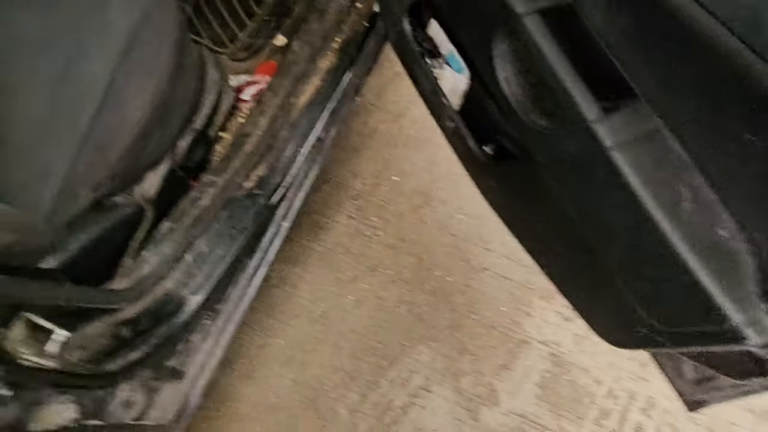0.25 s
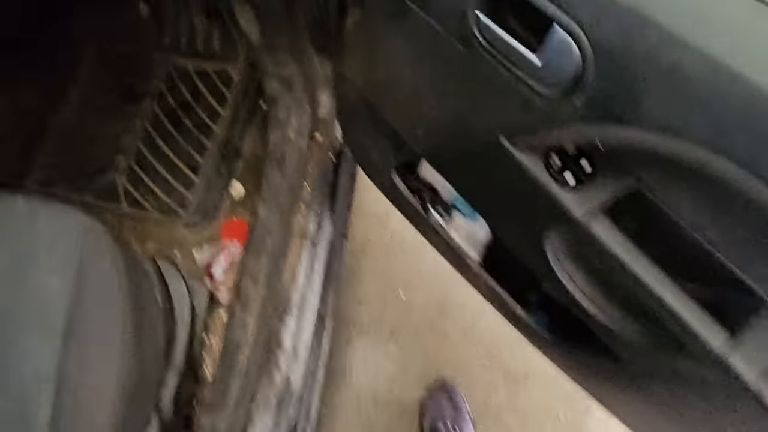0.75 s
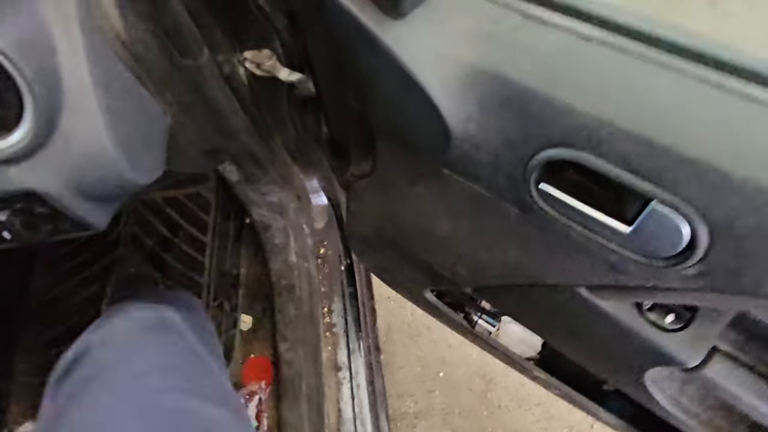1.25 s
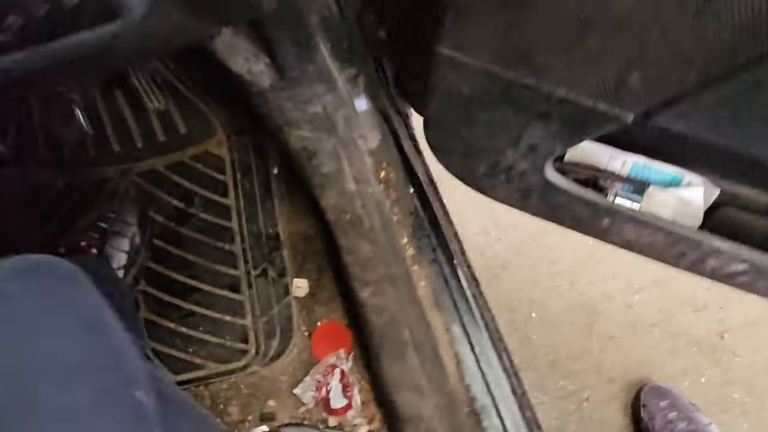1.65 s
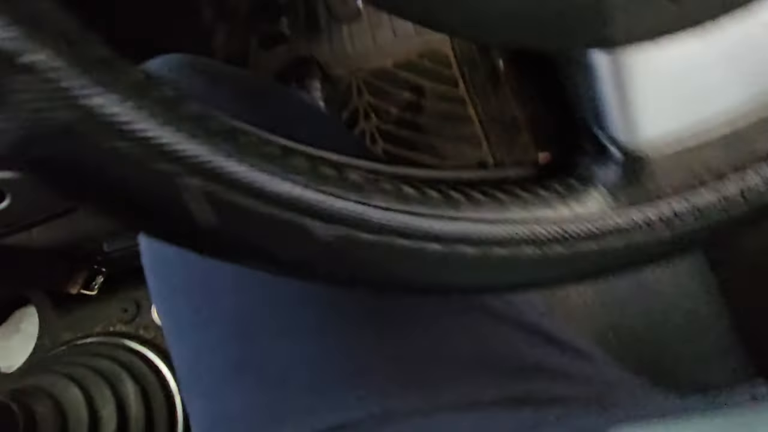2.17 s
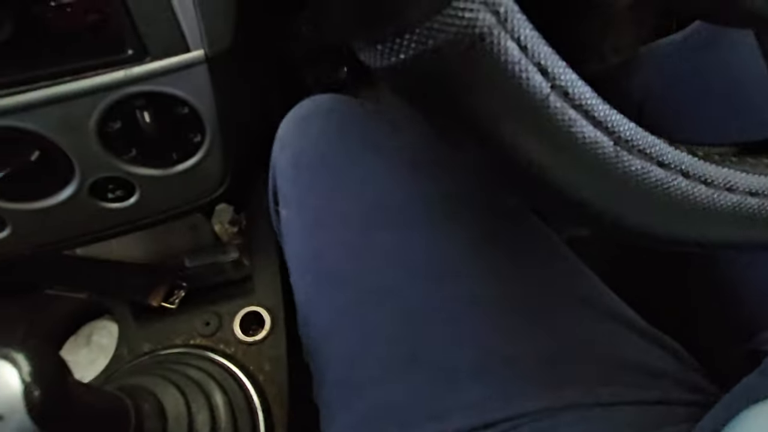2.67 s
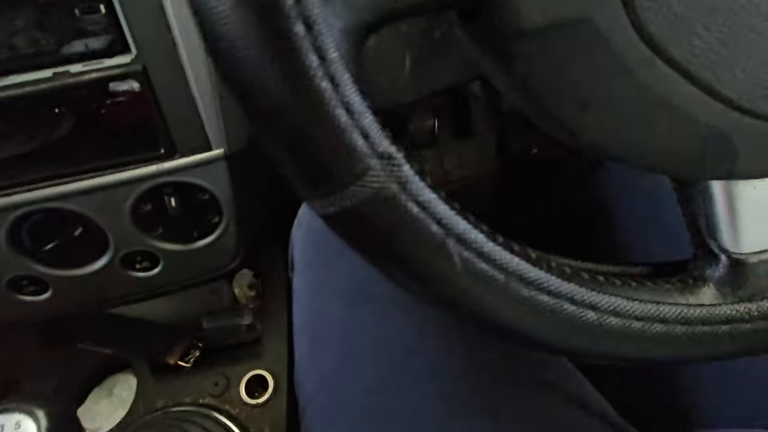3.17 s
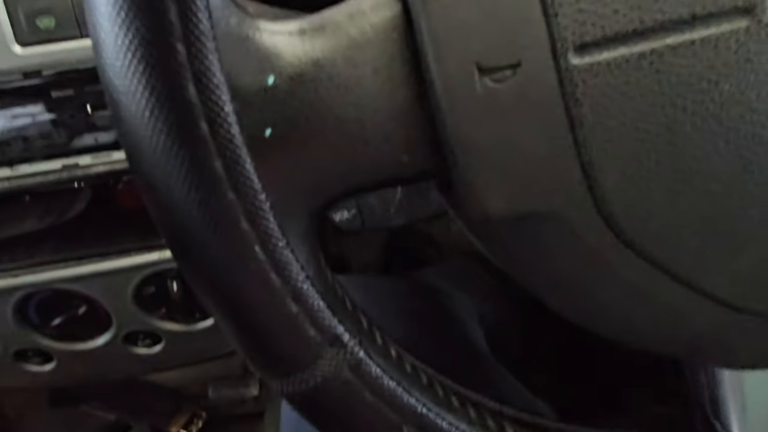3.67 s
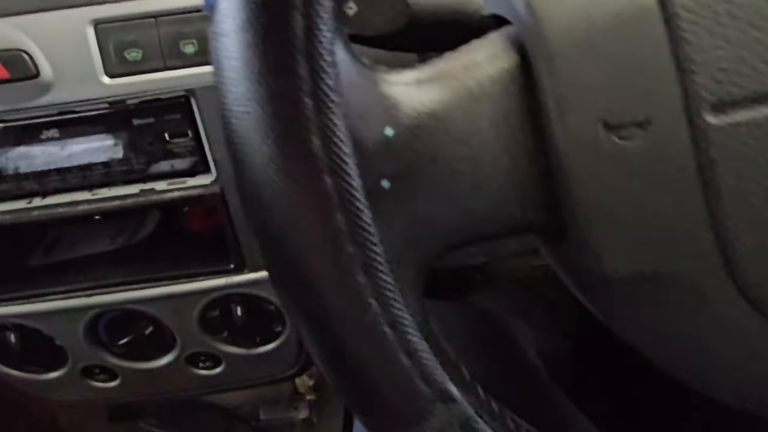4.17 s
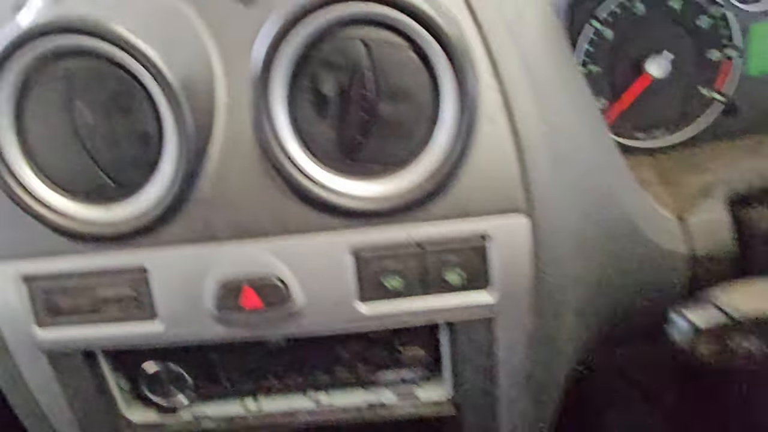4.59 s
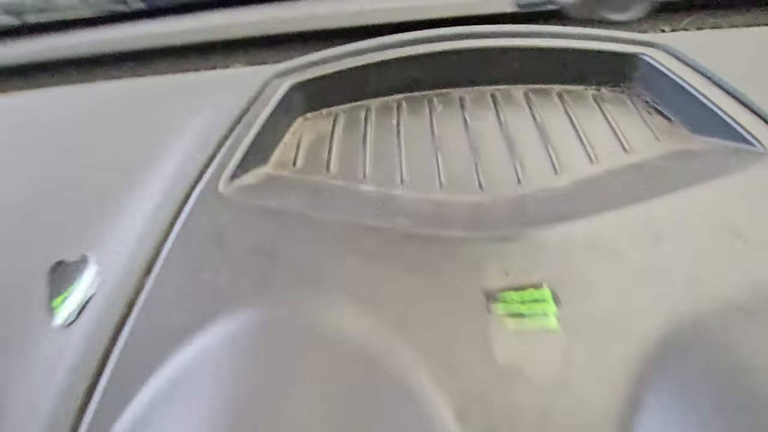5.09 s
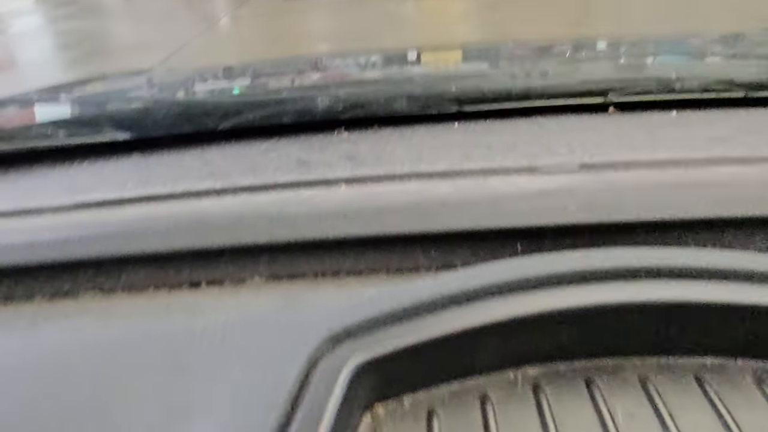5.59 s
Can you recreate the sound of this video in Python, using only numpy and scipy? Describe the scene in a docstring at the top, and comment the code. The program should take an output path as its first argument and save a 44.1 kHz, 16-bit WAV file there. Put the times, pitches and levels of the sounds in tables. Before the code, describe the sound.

Keys clink as someone climbs into a small car from a roaring garage, slams the door into hush, then clatters keys on plastic.

```python
"""Someone climbs into a small car in a noisy garage, keys in one hand and phone in the other.
First a diffuse roar (coloured noise), rustling cloth (grainy noise) and clinking keys (decaying modes);
feet and knees knock the body (noise cracks, panel and cabin modes), fingers tap the phone, soles scrape.
Then the door groans (gliding tones), latches and slams (cracks, modes, low tones) and seals out the roar.
In the quiet cabin the seat ticks, and the lifted bunch of keys clatters against ringing plastic trim."""
import sys
import numpy as np
from scipy import signal
from scipy.fft import rfft, irfft, next_fast_len
from scipy.io import wavfile
from scipy.ndimage import uniform_filter1d

SR = 44100
rng = np.random.default_rng(int(sys.argv[2]) if len(sys.argv) > 2 else 0)


def file_out(sig):
    """Save sig as 16-bit WAV at sys.argv[1]."""
    # one column per channel
    cols = np.atleast_2d(sig).T
    # limit, then scale
    lim = np.clip(cols, -1, 1)
    pcm = np.round(lim * 32767).astype(np.int16)
    wavfile.write(sys.argv[1], SR, pcm)


N = 257352  # samples
# In all tables, side/dB is left minus right, and t60/s is the time of a 60 dB decay.


def amp(db):
    """Logarithmic level: decibels to amplitude gain."""
    return np.exp(np.asarray(db) * (np.log(10) / 20))


def unit(x):
    """Normalisation: scale to rms 1."""
    return x / np.sqrt(np.mean(x ** 2) + 1e-20)


def unit_attack(x, size=441):
    """Onset normalisation: scale a blow to rms 1 over its first samples."""
    return x / np.sqrt(np.mean(x[..., :size] ** 2) + 1e-20)


def panned(x, side_db):
    """Interaural level difference: share a sound between left and right at constant power."""
    ratio = amp(np.atleast_1d(side_db))
    return x * np.array([ratio, np.ones_like(ratio)]) * np.sqrt(2 / (1 + ratio ** 2))


def add(out, s, x):
    """Superposition: mix a sound in at a time in seconds."""
    i = int(np.clip(s * SR, 0, N - 1))
    out[:, i:i + x.shape[1]] += x[:, :N - i]


def colour(x, points):
    """Minimum-phase filtering: a causal response through (f/Hz, level/dB) points."""
    size = next_fast_len(x.shape[-1] // 2 + 2048, real=True) * 2
    hz, db = np.transpose(points)
    f = np.arange(size // 2 + 1) * SR / size + 1  # the 1 Hz offset avoids log(0)
    below_first = np.minimum(f / hz[0], 1) ** 2  # falls 12 dB per octave
    gain = amp(np.interp(np.log(f), np.log(hz), db)) * below_first
    # fold the cepstrum onto positive times
    cepstrum = irfft(np.log(gain))
    cepstrum[1:size // 2] *= 2
    cepstrum[size // 2 + 1:] = 0
    return irfft(rfft(x, size) * np.exp(rfft(cepstrum)))[..., :x.shape[-1]]


def brighter(points, treble_db, from_hz=2500, full_hz=9000):
    """Contact stiffness: a harder or softer contact lifts or lowers the treble of a response."""
    return [(hz, db + treble_db * np.interp(hz, [from_hz, full_hz], [0, 1])) for hz, db in points]


def pair(size, likeness, lag_count=0):
    """Partial coherence: noise partly shared by two microphones; the right one may hear it first."""
    shared, own = rng.standard_normal(size), rng.standard_normal((2, size))
    likeness = np.clip(likeness, 0, 1)
    common = np.array([np.roll(shared, lag_count), shared])
    return np.sqrt(likeness) * common + np.sqrt(1 - likeness) * own


def fade(t60, size=SR // 3):
    """Exponential decay of a damped vibration."""
    return np.exp(-np.log(1000) * np.arange(size) / SR / max(t60, 1 / SR))


def swell(start, length, attack_s, t60):
    """Envelope of a movement: it builds up to its start, holds and dies away."""
    t = np.arange(N) / SR
    rise = np.clip(1 + (t - start) / attack_s, 0, 1) ** 2
    return rise * amp(-60 * np.clip((t - start - length) / t60, 0, 2))


def walk(rate):
    """Slow random modulation: chance levels joined smoothly, spread near 0.5."""
    size = int(SR / rate)
    steps = np.repeat(rng.standard_normal(N // size + 1), size)
    return 0.61 * uniform_filter1d(steps, size)[:N]


def shifting(x, rate, depth_db, count=7):
    """Octave-band modulation: each register from 250 Hz up swells and sinks on its own."""
    size = next_fast_len(N, real=True)
    spectrum = rfft(x, size)
    hz = (np.arange(spectrum.shape[1]) + 1) * SR / size
    register = np.clip(np.log2(hz / 250), 0, count - 1)
    out = 0
    for k in range(count):
        band = irfft(spectrum * np.maximum(1 - abs(register - k), 0), size)[:, :N]
        out = out + band * amp(depth_db * walk(rate))
    return out


def grains(length, grain_db, size=60):
    """Granular friction: tiny contacts of uneven strength, as a gain of rms 1."""
    return unit(np.repeat(amp(grain_db * rng.standard_normal(length // size + 1)), size)[:length])


def ring(modes, stretch=1, scatter_db=2, detune=.01, spread=0.68, lag_count=0):
    """Modal superposition: each blow reweights the modes; the microphones hear differing phases."""
    t, out = (np.arange(SR // 3) - np.array([[lag_count], [0]])) / SR, 0
    for hz, db, t60 in modes:
        size, tune, phase = rng.standard_normal(3)
        angle = 2 * np.pi * hz * (1 + detune * tune) * t + spread * phase * np.array([[1], [-1]])
        level = amp(db + scatter_db * size)
        out = out + level * fade(t60 * stretch) * np.sin(angle.astype(np.float32))
    return out


def struck_at(modes, lead_hz, others_db):
    """Selective excitation: the struck spot favours one mode, set to 0 dB, over the others."""
    lead = np.argmin([abs(hz - lead_hz) for hz, _, _ in modes])
    return [(hz, 0 if k == lead else db + others_db, t60) for k, (hz, db, t60) in enumerate(modes)]


def crack(t60, tail_db, likeness, snap_s=0.0078, rise_s=0.027):
    """Impact noise: a sharp snap and the brief buzz of the parts that met."""
    decay = fade(snap_s) + amp(tail_db) * fade(t60)
    return pair(SR // 3, likeness, lag_count=17) * decay * (1 - fade(rise_s))


def rubbed(x, t60, size=882):
    """Repeated contact: chatter of some milliseconds blurs the onset of a ring."""
    chatter = rng.standard_normal(size) * fade(t60, size) * .06
    chatter[0] = 1
    return signal.oaconvolve(x, chatter[None], axes=1)[:, :x.shape[1]]


# diffuse roar of the hall: f/Hz, level/dB
ROAR_COLOUR = [(82, -31), (140, -1.5), (269, -6.5), (309, -12.5), (417, -7.5), (584, -11.5), (958, -18.5),
               (1260, -22.5), (1840, -27), (2160, -26.5), (2970, -33), (4590, -32.5), (8480, -45),
               (13400, -55), (16000, -46)]
# hollow band in the roar: f/Hz, level/dB
HOLLOW_BAND = [(700, -19.5), (950, -1.5), (1090, -3), (1250, -13.5), (1550, -21.5), (2100, -14.5),
               (2600, -20), (16000, -61.5)]
# dull trace through the body: f/Hz, level/dB
LEAK_RESPONSE = [(60, 3), (130, -3), (200, -15.5), (300, -16.5), (400, -14), (530, -12.5), (700, -30),
                 (1200, -37.5), (4000, -40), (16000, -32.5)]
# the roar fades as the phone nears the door opening, drops once inside and is sealed off by the door
GARAGE_DB, GARAGE_FALL_DB_PER_S, GARAGE_SIDE_DB = -32.5, 3.5, -1
INSIDE_S, DUCK_IN_S, INSIDE_DB, SEAL_DB_PER_S = 2.03, 0.04, -4, 97
HOLLOW_DB, HOLLOW_FALL_DB_PER_S, LEAK_DB = -36.5, 19.5, -67.5


def garage():
    """Diffuse field and transmission loss: a roar, hollow at first, fades over a steady dull trace."""
    t = np.arange(N) / SR
    inside = np.clip((t - INSIDE_S) / DUCK_IN_S + .5, 0, 1)
    roar = unit(shifting(colour(pair(N, 0.27), ROAR_COLOUR), rate=7.6, depth_db=1.5))
    roar = roar * amp(GARAGE_DB - GARAGE_FALL_DB_PER_S * t + INSIDE_DB * inside)
    hollow = unit(colour(pair(N, 0.18), HOLLOW_BAND)) * amp(HOLLOW_DB - HOLLOW_FALL_DB_PER_S * t)
    seal = amp(-SEAL_DB_PER_S * np.maximum(t - LATCH_CONTACTS[0][0], 0))  # from the first latch contact
    leak = amp(LEAK_DB) * unit(colour(pair(N, 1.0), LEAK_RESPONSE))
    return panned((roar + hollow) * seal, GARAGE_SIDE_DB) + leak


# the body steps up, leans in, slides onto the seat, settles, shifts, reaches out:
# t/s, length/s, rumble level/dB, cloth level/dB, rumble side/dB, cloth side/dB
BODY_MOVES = [(0, 0.37, -27.5, -48, 3.5, 30), (0.463, 0.2, -43, -45, -5, -5),
              (0.76, 0.62, -31.5, -54, -1, 3.5), (1.471, 0.34, -26, -42, 8.5, 2),
              (2.006, 0.71, -34, -53.5, 0, -0.5), (3.229, 0.046, -57.5, -73.5, -8, -2.5),
              (3.76, 0.16, -85.5, -71, 0, -10), (4.198, 0.042, -54, -72, -5, -8),
              (4.401, 0.74, -43, -48.5, 0, 0), (5.258, .08, -39.5, -42, -1, 3),
              (5.5, 0.4, -38, -39, -2, 1.5)]
# rustle of clothes: f/Hz, level/dB
CLOTH_RESPONSE = [(300, 7.5), (700, 1.5), (1500, -4.5), (3500, -5), (7000, -9.5), (11000, -10.5),
                  (16000, -9)]
MOVE_ATTACK_S, RUMBLE_T60_S, CLOTH_T60_S = 0.27, 0.64, 0.21
FITS_PER_S, FITS_DB = 14, 2.1  # cloth slides in fits and starts; dB per unit of walk()


def cloth():
    """Stick-slip friction: fibres catch and creases slip with every move, a grainy hiss."""
    catches = grains(N, grain_db=3.0) * grains(N, grain_db=2, size=350)
    hiss = colour(pair(N, 0.11) * catches, CLOTH_RESPONSE)
    effort = 0
    for s, length, _, db, _, side_db in BODY_MOVES:
        effort = effort + panned(amp(db) * swell(s, length, MOVE_ATTACK_S, CLOTH_T60_S), side_db)
    return unit(hiss * amp(FITS_DB * walk(FITS_PER_S))) * effort


# low resonances of the cabin: f/Hz, level/dB
RUMBLE_RESPONSE = [(15, -45.5), (25, -11), (52, 0), (70, 2.5), (156, -9.5), (236, -17), (282, -16.5),
                   (300, -20.5), (390, -43.5), (660, -120)]


def rumble():
    """Forced low resonance: shifting weight stirs the bass of the cabin."""
    weight = 0
    for s, length, db, _, side_db, _ in BODY_MOVES:
        weight = weight + panned(amp(db) * swell(s, length, MOVE_ATTACK_S, RUMBLE_T60_S), side_db)
    return unit(colour(pair(N, 0.84), RUMBLE_RESPONSE)) * weight


# modes of a key: f/Hz, relative level/dB, share of the ring time
BLADE_MODES = [(5650, -24, .8), (7235, -20, 1), (8400, -11, .8), (9257, -5, 1), (9590, -15, .6),
               (10182, -15, 1.1), (12296, -13, .5), (13252, -1, 1), (14150, -12, .6), (14418, 0, 1),
               (14630, -8, .5), (15650, -7, .6)]
# a jolt of the hand shakes the bunch: t/s, length/s, level/dB
HAND_SHAKES = [(0, 0.044, -46.5), (0.422, 0.0094, -44), (1.535, 0.13, -48), (1.955, 0.064, -39.5),
               (2.284, 0.052, -46), (4.34, 0.16, -46), (5.167, 0.058, -44), (5.252, 0.046, -32.5),
               (5.497, 0.015, -27.5), (5.679, 0.024, -33)]
SHAKE_ATTACK_S, SHAKE_T60_S = 0.061, 0.09


def jingle(rate=170, ring_s=0.036, graze_db=-2, count=12):
    """Random impact train: while the bunch is shaken, several keys keep grazing each other lightly."""
    out, shake = 0, 0
    for s, length, db in HAND_SHAKES:
        shake = shake + amp(db) * swell(s, length, SHAKE_ATTACK_S, SHAKE_T60_S)
    for _ in range(count):
        touches = (rng.random(N) < rate / count / SR) * amp(3.5 * rng.standard_normal(N))
        blade = unit_attack(ring(BLADE_MODES, ring_s, scatter_db=8, detune=.045, spread=1.1))
        graze = colour(crack(0.035, tail_db=-2.5, likeness=0.13), [(3000, -3.0), (15000, -6.0)])
        blade = blade + amp(graze_db) * unit_attack(graze)
        blade = blade / np.sqrt(count * np.sum(blade ** 2) / 2)
        out = out + signal.oaconvolve((unit(touches) * shake)[None], blade, axes=1)[:, :N]
    return out


# the key ring swings against the fob: t/s, level/dB, side/dB
HOOP_TOUCHES = [(0.016, -36.5, -18), (0.029, -42, 11), (0.045, -36.5, -17), (0.063, -36.5, -14),
                (1.533, -38, 7), (4.367, -51, 10), (4.516, -62, -2)]
# modes of the key ring: f/Hz, relative level/dB, t60/s
HOOP_MODES = [(2300, 4.5, 0.094), (2470, 5, 0.072), (2716, 22, 0.022), (2930, -10, 0.032), (3120, -22, .05),
              (3850, -2, 0.036), (6170, 4, 0.055)]


def hoop_touches():
    """Modal vibration of a hoop: the key ring sounds as it touches the fob."""
    out = np.zeros((2, N))
    for s, db, side_db in HOOP_TOUCHES:
        hoop = ring(HOOP_MODES, scatter_db=2.5, detune=.02)
        add(out, s, amp(db) * panned(unit_attack(hoop), side_db))
    return out


# key on key, the clearest touches: t/s, ring level/dB, tick level/dB
KEY_CLINKS = [(0.042, -35, -38), (0.063, -36, -34.5), (0.2, -46, -48), (0.241, -30.5, -34),
              (0.6434, -56, -62), (0.9222, -39, -43.5), (1.349, -51, -42), (1.55, -37, -39.5),
              (1.623, -30, -37), (1.97, -49, -49), (2.0027, -48, -54), (2.076, -47, -45.5),
              (2.386, -43, -50), (3.795, -46, -60.5), (4.2217, -37.5, -45.5), (4.232, -45, -57),
              (4.326, -31, -42.5), (4.366, -34, -37), (4.511, -40, -39), (4.6305, -45, -47),
              (4.9345, -33.5, -40.5), (4.968, -41, -48), (5.2434, -27, -26.5), (5.283, -28.5, -30.5),
              (5.337, -36.5, -55), (5.366, -37, -36.5), (5.4405, -27.5, -36), (5.494, -16.5, -24),
              (5.661, -30, -31), (5.783, -18.5, -31.5)]
# the clinks start at the left, move in front of the phone and end to the left: t/s, side/dB
KEY_POSITION = [(.25, 17), (.6, 2), (4.7, -0.5), (5.83, 9)]
CLINK_T60_S, BLADE_DB = 0.046, -2  # damped blades; their level against the ring level


def clinks():
    """Contact damping: thin brass blades held in the bunch tick together and stop at once."""
    out = np.zeros((2, N))
    tick_colour = [(2200, -10.5), (3300, 5.0), (6000, -0.5), (9000, 0.5), (11500, -5.5), (16000, -5.0)]
    edge_colour = [(8000, -55), (11000, -4), (13000, -8), (14500, -18), (16000, -2.0)]
    for s, db, tick_db in KEY_CLINKS:
        tick = crack(0.087, tail_db=-16.0, likeness=0.037, snap_s=0.017)
        tick = unit_attack(colour(tick, tick_colour))
        edge = crack(0.035, tail_db=-25.0, likeness=.25, snap_s=0.0072)
        edge = unit_attack(colour(edge, edge_colour))
        blade = unit_attack(ring(BLADE_MODES, CLINK_T60_S, scatter_db=6, detune=.035, spread=1.2))
        clink = amp(tick_db) * tick + amp(db) * (edge + amp(BLADE_DB) * blade)
        add(out, s, panned(clink, np.interp(s, *np.transpose(KEY_POSITION))))
    return out


# door and sill panels: f/Hz, relative level/dB, t60/s
BODY_PANEL_MODES = [(152, 0.5, .1), (195.8, 3.5, 0.1), (238, 4.5, 0.076), (276, -2, 0.09),
                    (359, 1.5, 0.085), (406.2, 0, 0.069), (441, -5.5, 0.07), (550.6, -8.5, 0.054),
                    (690, -4.5, 0.036)]


def panel(lead_hz=230):
    """Bending modes of a plate: hollow knock of a panel under a padded push."""
    struck = struck_at(BODY_PANEL_MODES, lead_hz, others_db=-6)
    modes = ring(struck, scatter_db=2, detune=.025, spread=.4)
    return unit_attack(modes * (1 - fade(0.026)), size=882)


# plastic trim resonances: f/Hz, relative level/dB, unstretched t60/s
PLASTIC_MODES = [(760, -6, .035), (894, -2, .03), (1060, -1, .06), (1280, 0, .07), (1370, -4, .04),
                 (1560, -4, .035), (1850, -2, .04), (2090, -2, .055), (2290, -2, .045), (2620, -4, .035),
                 (3330, -4, .05), (3550, -2, .046), (4130, -2, .04), (5040, -6, .03), (5370, -6, .03)]


def trim(lead_hz=1280, others_db=0, stretch=1):
    """Heavily damped modes: short ring of the plastic trim, different at each spot."""
    struck = struck_at(PLASTIC_MODES, lead_hz, others_db)
    modes = ring(struck, stretch, scatter_db=2, detune=.018, spread=1.3)
    return unit_attack(rubbed(modes, 0.027) * (1 - fade(0.008)))


# shoes, knees and door against the car: t/s, crack level/dB, boom level/dB, panel level/dB,
# leading panel mode f/Hz, trim level/dB, side/dB, crack tail t60/s
BODY_KNOCKS = [(0.039, -41, -16.5, -45, 195, -60, 31, 0.046),
               (0.489, -27.5, -20.5, -39.5, 195, -44, -19, 0.05),
               (0.536, -31.5, -21, -32, 240, -34.5, -13, .12),
               (1.314, -26.5, -17.5, -18.5, 359, -35, -0.5, 0.085),
               (1.533, -28.5, -31, -34, 195, -40, -3, 0.017), (1.583, -37.5, -15, -20.5, 150, -48, 5, 0.17),
               (1.636, -56.5, -14.5, -43, 150, -60, 25, .07), (1.745, -35.5, -15, -21.5, 150, -50, 8, .14),
               (2.061, -40, -41, -23, 410, -56, -1.5, 0.065), (2.165, -44, -44, -30, 360, -58, -3, 0.033),
               (2.563, -26.5, -22, -20.5, 240, -46, -0.5, 0.032),
               (2.595, -20.5, -19, -25, 440, -33, 1, 0.023),
               (2.645, -41, -25, -41.5, 195, -57.5, -1, 0.028), (4.772, -46, -42, -48, 550, -44.5, -1, .06),
               (5.825, -33.5, -45, -33, 410, -50, 0, .08)]
# contact noise of a knock: f/Hz, level/dB
KNOCK_RESPONSE = [(290, -14), (500, 0), (1160, -12), (2040, -16), (2570, -23.5), (5020, -23.5), (5550, -28),
                  (8700, -33.5), (11600, -30.5), (16000, -35.5)]
# cabin air and floor: f/Hz, relative level/dB, t60/s
CABIN_MODES = [(65.15, -9.5, 0.28), (82, 2, 0.11), (122.7, -3.5, 0.12)]


def knocks():
    """Impact excitation: each blow on the car body cracks, rings panels and trim and booms the cabin."""
    out = np.zeros((2, N))
    for s, crack_db, boom_db, panel_db, panel_hz, trim_db, side_db, t60 in BODY_KNOCKS:
        contact = crack(t60, tail_db=-1.5, likeness=0.2, snap_s=0.0067, rise_s=.015)
        contact = unit_attack(colour(contact, KNOCK_RESPONSE))
        boom = ring(CABIN_MODES, scatter_db=4.5, detune=0.02, spread=0.25) * (1 - fade(0.02))
        blow = amp(crack_db) * contact + amp(panel_db) * panel(panel_hz)
        blow = blow + amp(trim_db) * trim(stretch=.55) + amp(boom_db) * unit_attack(boom, size=1323)
        add(out, s, panned(blow, side_db))
    return out


def cabin(x, t60=0.072, echo_db=-15.5):
    """Reverberation: windows and dashboard return a short, dense echo that the seats soak up quickly."""
    echo = colour(pair(SR // 3, 0.27), [(450, 2.0), (3000, -0.5), (16000, -5.5)])
    echo = echo * fade(t60) * (1 - fade(0.044))
    echo = echo / np.sqrt(np.sum(echo ** 2) / 2)
    return x + amp(echo_db) * signal.oaconvolve(x, echo, axes=1)[:, :N]


# trousers drag over the seat: t/s, length/s, level/dB, side/dB
SEAT_SCUFFS = [(0.454, 0.11, -32, -8.5), (1.45, 0.42, -37.5, -1)]


def scuffs(attack_s=0.086, t60=0.4):
    """Loaded sliding friction: cloth under weight drags with a duller, fuller sound."""
    drag_colour = [(130, -2.0), (420, -9.5), (1000, -16.5), (2100, -22.5), (4500, -28.0), (9000, -43.0)]
    drag, effort = unit(colour(pair(N, 0.36), drag_colour)), 0
    for s, length, db, side_db in SEAT_SCUFFS:
        effort = effort + panned(amp(db) * swell(s, length, attack_s, t60), side_db)
    return drag * effort


# a key swings clear, led by the mode that the touch favours:
# t/s, level/dB, ring t60/s, leading mode f/Hz, other modes relative level/dB
SWINGING_KEYS = [(0.43, -48, .06, 14630, -8), (0.644, -50, .05, 15650, -14), (0.923, -42, 0.088, 8400, -7),
                 (1.475, -62, .07, 14418, -4), (1.552, -43, 0.1, 14418, -3), (1.553, -42, 0.12, 9257, -12),
                 (1.577, -42, 0.12, 8400, -3), (1.628, -39, 0.064, 9257, -12), (1.654, -51, .06, 7235, -5),
                 (1.712, -47, 0.06, 9257, -5), (1.735, -48, .06, 14630, -6), (1.862, -49, 0.068, 9257, -10),
                 (1.896, -44.5, .07, 9257, -4), (2.005, -51, .07, 9257, -8), (2.268, -58, .06, 9257, -6),
                 (1.982, -37, 0.032, 8400, -3), (2.296, -42, 0.048, 14600, -2),
                 (2.334, -52.5, 0.23, 8400, -20), (2.419, -52, 0.047, 7235, -18),
                 (4.33, -34.5, 0.18, 14600, -15), (4.334, -47.5, 0.23, 5650, -20),
                 (4.367, -37, .04, 12296, -6), (4.968, -50, 0.064, 7235, -14),
                 (5.262, -27.5, 0.22, 14200, -11), (5.708, -30.5, 0.35, 14418, -16),
                 (5.784, -20, 0.58, 13252, 0), (5.799, -15.5, 0.1, 14660, -5)]


def neighbour():
    """Coupled damped modes: a swinging key also touches the next one, tuned differently."""
    return unit_attack(rubbed(ring(BLADE_MODES, .06, scatter_db=5, detune=.05, spread=1.2), .04))


def free_rings(neighbour_db=-3.5):
    """Free vibration: a key hanging clear of the bunch rings on."""
    out = np.zeros((2, N))
    for s, db, t60, lead_hz, others_db in SWINGING_KEYS:
        struck = struck_at(BLADE_MODES, lead_hz, others_db)
        blade = ring(struck, t60, scatter_db=1.2, detune=.0008, spread=1.1)
        blade = unit_attack(blade * (1 - fade(.008)))
        add(out, s, amp(db) * (blade + amp(neighbour_db) * neighbour()))
    return out


# a finger snaps off the phone case beside one microphone: t/s, level/dB, f/Hz, t60/s, side/dB
CASE_TAPS = [(0.4608, -1.5, 1698, 0.0014, -48), (0.5351, -1, 170, 0.013, -44)]
# response of the case: f/Hz, level/dB
CASE_RESPONSE = [(20, 1), (4500, -1.5), (9000, -16), (16000, -24.5)]


def finger_taps():
    """Damped oscillator: the phone case answers a snapping finger with one decaying cosine."""
    out = np.zeros((2, N))
    for s, db, hz, t60, side_db in CASE_TAPS:
        case = fade(t60) * np.cos(2 * np.pi * hz * np.arange(SR // 3) / SR)
        add(out, s, panned(-amp(db) * colour(case, CASE_RESPONSE), side_db))
    return out


# a hand or sleeve brushes past: t/s, length/s, level before the Hann window/dB, side/dB
HAND_BRUSHES = [(0.466, 0.032, -33, -7), (0.532, 0.039, -31, -27), (0.711, 0.056, -42.5, -18),
                (1.673, 0.081, -41, 0), (3.563, 0.16, -66.5, -20), (3.691, 0.076, -69, -11),
                (3.763, 0.58, -68, 16), (4.034, 0.12, -57, -0.5), (4.381, 0.14, -48, -4)]
# brushing noise: f/Hz, level/dB
BRUSH_RESPONSE = [(600, -15.5), (2000, 2.5), (4500, 7.5), (7000, 0.5), (9000, -3), (16000, 0)]


def brushes(grain_db=4):
    """Granular friction noise: a hand or sleeve brushes past in short grainy bursts."""
    out = np.zeros((2, N))
    for s, length, db, side_db in HAND_BRUSHES:
        size = int(length * SR)
        brush = unit(colour(pair(size, .4) * grains(size, grain_db), BRUSH_RESPONSE))
        add(out, s, panned(amp(db) * brush * np.hanning(size), side_db))
    return out


# a sole scrapes over floor and sill: t/s, length/s, pitch f/Hz, level before the Hann window/dB
SOLE_SCRAPES = [(0.84, 0.089, 830, -38.5), (0.971, 0.058, 526, -43), (1.391, .04, 2000, -44.5),
                (1.439, 0.052, 900, -40), (1.804, 0.054, 700, -41.5), (1.9, 0.06, 557, -36.5),
                (2.225, 0.044, 680, -45.5), (2.505, .03, 645, -48)]
# band around each pitch: multiple of the pitch, level/dB
GRIT_BAND = [(.4, -23), (.8, 2), (1, 2.5), (1.25, -5), (2.5, -18.5), (7, -28.5)]


def scrapes(grit_db=3.0):
    """Stick-slip friction: grit under a sole catches and slips, each scrape around its own pitch."""
    out = np.zeros((2, N))
    for s, length, hz, db in SOLE_SCRAPES:
        size = int(length * SR)
        band = [(hz * k, band_db) for k, band_db in GRIT_BAND]
        grit = colour(pair(size, 0.28) * grains(size, grit_db, size=150), band)
        add(out, s, amp(db) * unit(grit) * np.hanning(size))
    return out


# a push on the seat: t/s, length/s, f/Hz, peak level/dB
AIR_SWAYS = [(2.492, 0.077, 112, -23.5), (3.371, 0.053, 71.6, -46), (3.485, 0.057, 62, -56),
             (3.958, .08, 62, -60), (4.206, 0.096, 65.5, -41), (4.766, .19, 60.6, -26.5),
             (5.6, 0.088, 130, -28.5)]


def sways():
    """Low-frequency pressure oscillation: a push on the seat sways the cabin air."""
    out = np.zeros((2, N))
    for s, length, hz, db in AIR_SWAYS:
        t = np.arange(int(length * SR)) / SR
        add(out, s, panned(amp(db) * np.sin(2 * np.pi * hz * t) * np.hanning(len(t)), 0))
    return out


# the door groans and its seal squeaks: t/s, length/s, start f/Hz, end f/Hz, level/dB
DOOR_GROANS = [(2.564, 0.027, 150, 185, -15.5), (2.573, 0.062, 330.5, 452, -27.5),
               (2.885, 0.015, 600, 510, -20)]


def groans():
    """Friction-driven tones: the pulled door groans and its rubber seal squeaks in short glides."""
    out = np.zeros((2, N))
    for s, length, start_hz, end_hz, db in DOOR_GROANS:
        hz = np.linspace(start_hz, end_hz, int(length * SR))
        tone = np.sin(2 * np.pi * np.cumsum(hz) / SR)
        add(out, s, panned(amp(db) * tone * signal.windows.tukey(len(hz)), 0))
    return out


# the latch catches twice and the door beds into its seals: t/s, snap level/dB, snap tail t60/s,
# steel level/dB, leading steel mode f/Hz, panel level/dB, treble lift/dB
LATCH_CONTACTS = [(2.81, -21.5, 0.2, -23, 1080, -26.5, -9), (2.817, -29, .05, -28.5, 2100, -38.5, -7.5),
                  (2.832, -18, .04, -21, 1281, -18, 3.5), (2.837, -26.5, .03, -27, 4398, -27, 1.5),
                  (2.851, -36, .085, -38, 1787, -27.5, -2), (2.871, -33.5, 0.09, -36.5, 1787, -19.5, -6),
                  (2.887, -38.5, 0.081, -39, 820, -24, -17.5)]
# contact noise of the latch: f/Hz, level/dB
LATCH_RESPONSE = [(290, -32.5), (500, -2), (868, -14.5), (2070, -15), (2260, -23.5), (3980, -23),
                  (4470, -22), (7100, -28), (9770, -27), (16000, -35)]
# steel latch and door skin: f/Hz, relative level/dB, t60/s
STEEL_MODES = [(820, -2, .05), (1080, 0, .05), (1281, 1, .07), (1523, 0, .06), (1787, -2, .11),
               (2100, -2, .06), (2290, -5, .05), (2536, -6, .05), (3580, -8, .04), (4398, -5, .035),
               (4565, -9, .04), (4899, -4, .04), (5211, -9, .04)]


def latch(chatter_db=1.5):
    """Chattering impact: the latch rattles over its striker and rings, the door lands on its seals."""
    out = np.zeros((2, N))
    for s, db, t60, steel_db, lead_hz, panel_db, treble_db in LATCH_CONTACTS:
        contact = crack(t60, tail_db=-5.0, likeness=0.4, rise_s=0.0072) * grains(SR // 3, chatter_db)
        snap = unit_attack(colour(contact, brighter(LATCH_RESPONSE, treble_db)))
        struck = struck_at(STEEL_MODES, lead_hz, others_db=-1)
        steel = ring(struck, scatter_db=1.5, detune=.006, spread=.5, lag_count=14)
        steel = unit_attack(rubbed(steel, .03) * (1 - fade(0.011)))
        add(out, s, amp(db) * snap + amp(steel_db) * steel + amp(panel_db) * panel())
    return out


# the door pumps the cabin: t/s, f/Hz, level/dB, t60/s
SLAM_TONES = [(2.84, 125, -3, 0.24), (2.828, 49, -10, 0.14), (2.884, 59, -4, 0.32), (2.902, 120, -17, 0.22)]
# the body shudders after the slam: f/Hz, level/dB
SHUDDER_RESPONSE = [(45, 8.5), (125, 11.5), (180, -8), (300, -23), (430, -11.5), (560, -23.5), (800, -36),
                    (2200, -45), (4000, -51), (16000, -69.5)]


def slam(shut_s=2.84):
    """Cavity resonance: the shut door pumps the cabin air into decaying booms and the body shudders."""
    out, t = np.zeros((2, N)), np.arange(SR) / SR
    for s, hz, db, t60 in SLAM_TONES:
        boom = amp(db) * np.sin(2 * np.pi * hz * t) * fade(t60, size=SR)
        add(out, s, panned(boom, -4.0))
    shudder = unit(colour(pair(SR, 0.9), SHUDDER_RESPONSE)) * fade(0.56, size=SR)
    add(out, shut_s, amp(-12) * shudder)
    return out


# a loose part in the door bounces on after the slam: t/s, level/dB
LOOSE_BOUNCES = [(2.909, -41), (2.945, -39), (2.979, -49.5), (3.011, -54), (3.048, -62)]
# it sounds duller than the latch: f/Hz, level/dB
DULLING_RESPONSE = [(60, -2), (1900, -4.5), (2600, 2), (6000, -13), (16000, -13.5)]


def rattles():
    """Successive rebounds: short, uneven bounces of a loose part in the door."""
    out = np.zeros((2, N))
    for s, db in LOOSE_BOUNCES:
        buzz = colour(crack(0.031, tail_db=-6.0, likeness=0.4), LATCH_RESPONSE)
        add(out, s, amp(db) * unit_attack(colour(buzz, DULLING_RESPONSE)))
    return out


# faint ticks of the seat cover: t/s, level/dB
SEAT_TICKS = [(3.283, -72), (3.3, -70), (3.729, -64), (3.864, -68), (4.109, -56), (4.18, -65), (5.073, -50),
              (5.088, -43.5), (5.104, -45.5), (5.123, -51)]


def seat_ticks():
    """Impulsive noise: the seat cover gives faint ticks."""
    out = np.zeros((2, N))
    for s, db in SEAT_TICKS:
        tick = colour(crack(0.033, tail_db=-20, likeness=0.3, rise_s=0.0013), BRUSH_RESPONSE)
        add(out, s, amp(db) * unit_attack(tick))
    return out


# keys and fob against plastic trim: t/s, snap level/dB, ring level/dB, leading mode f/Hz,
# hollow knock level/dB, snap tail t60/s, treble lift/dB
TRIM_CONTACTS = [(5.138, -52, -50, 894, -45, .05, -6), (5.164, -40.5, -42, 2090, -46, .11, 7),
                 (5.212, -14.5, -18, 2290, -26.5, 0.054, -1), (5.23, -24.5, -21, 2290, -37, 0.035, 3),
                 (5.243, -28, -27.5, 2290, -26.5, .16, -2), (5.258, -30.5, -36, 3550, -38, 0.094, -2),
                 (5.274, -30, -30, 2290, -34, 0.094, -4), (5.288, -38, -34, 2090, -39.5, 0.045, -6),
                 (5.441, -30, -33, 2090, -37.5, 0.12, -19), (5.464, -31, -32, 2090, -38.5, 0.12, -11),
                 (5.49, -25.5, -27, 1850, -52, 0.018, 0), (5.495, -21.5, -25.5, 2090, -34.5, 0.03, 4),
                 (5.505, -28.5, -45, 1060, -45, 0.24, 2), (5.5596, -29.5, -33, 2290, -23, 0.019, 7),
                 (5.565, -22, -31, 1280, -26.5, 0.011, -29), (5.585, -36, -41, 1060, -42, 0.044, -5),
                 (5.608, -28.5, -35, 1060, -26, 0.042, 3), (5.614, -26, -26, 1370, -25, .03, 5),
                 (5.6235, -17, -26.5, 1370, -45, 0.016, 0), (5.651, -30.5, -45, 1280, -34, 0.26, -14),
                 (5.677, -20, -20.5, 2090, -29, 0.1, -8), (5.712, -35, -40, 1060, -33, 0.078, 10),
                 (5.756, -38.5, -44.5, 2090, -40, 0.086, -17)]
# contact noise on the trim: f/Hz, level/dB
TRIM_RESPONSE = [(240, -25), (400, 2), (626, 1), (1310, 4.5), (1530, 6), (5190, -1.5), (7750, -4),
                 (9320, -7.5), (10100, -9.5), (13500, -9), (16000, -19)]


def clatter(chatter_db=5):
    """Impact and modal response: keys and fob chatter on hollow plastic trim and set it ringing."""
    out = np.zeros((2, N))
    for s, db, ring_db, lead_hz, hollow_db, t60, treble_db in TRIM_CONTACTS:
        contact = crack(t60, tail_db=-5.5, likeness=0.1, snap_s=0.007, rise_s=0.0021)
        contact = contact * grains(SR // 3, chatter_db)
        snap = unit_attack(colour(contact, brighter(TRIM_RESPONSE, treble_db)))
        plastic = amp(ring_db) * trim(lead_hz, others_db=-7.5)
        add(out, s, amp(db) * snap + plastic + amp(hollow_db) * panel(lead_hz=240))
    return panned(out, 0.1)


def scene():
    """Superposition at two microphones; the keys are too close for the cabin to colour them."""
    blows = cabin(knocks() + groans() + latch() + slam() + rattles() + clatter())
    bunch = jingle() + hoop_touches() + clinks() + free_rings()
    handling = finger_taps() + brushes() + sways() + seat_ticks()
    body = cloth() + rumble() + scuffs() + scrapes()
    return garage() + body + bunch + blows + handling


def record(dry, low_hz=32, top_hz=15900):
    """Band limiting and clipping: the phone drops deep bass, holds peaks at full scale, cuts the top."""
    heard = signal.sosfilt(signal.butter(2, low_hz, "high", fs=SR, output="sos"), dry)
    top_cut = signal.ellip(10, .2, 70, top_hz, fs=SR, output="sos")
    return signal.sosfilt(top_cut, np.clip(heard, -1, 1))


dry = scene()
out = record(dry)
file_out(out)
```